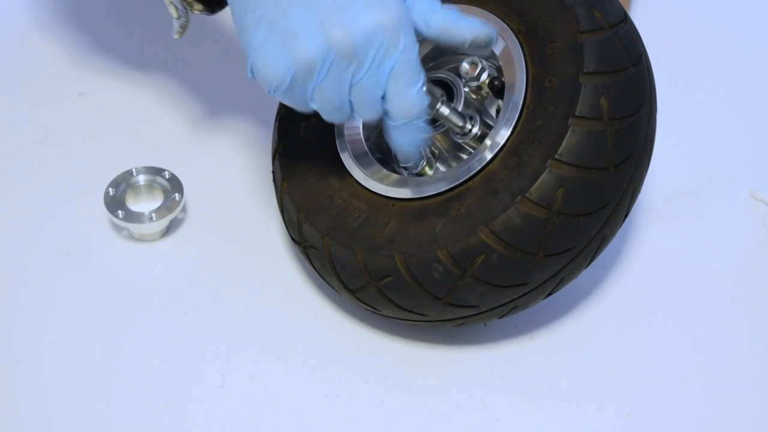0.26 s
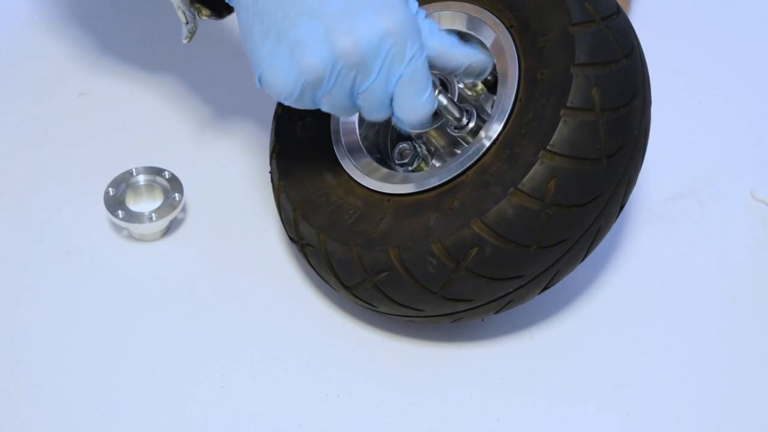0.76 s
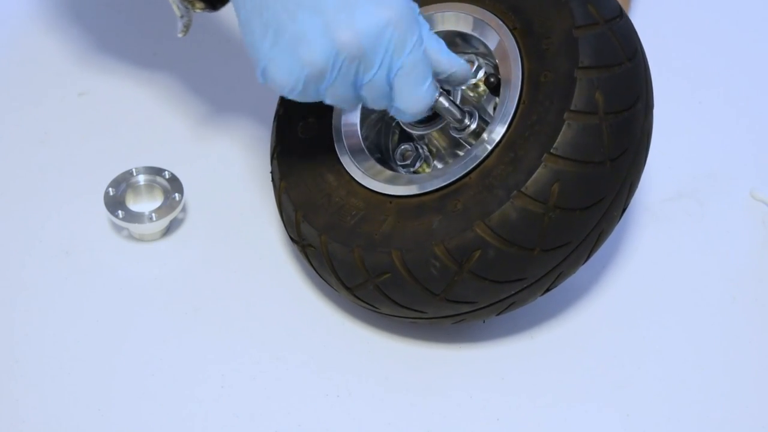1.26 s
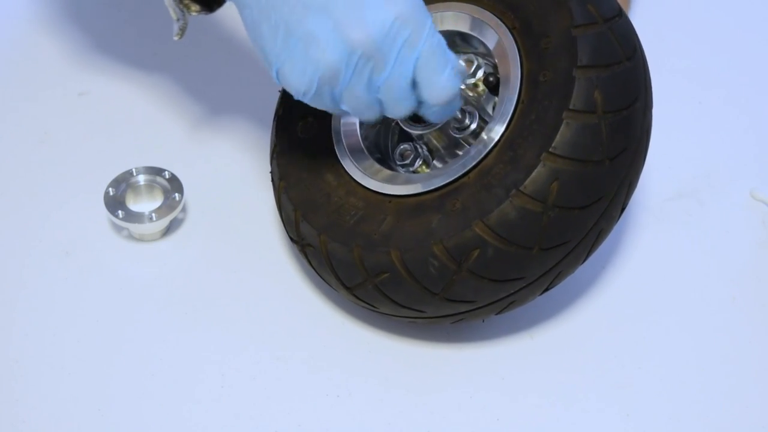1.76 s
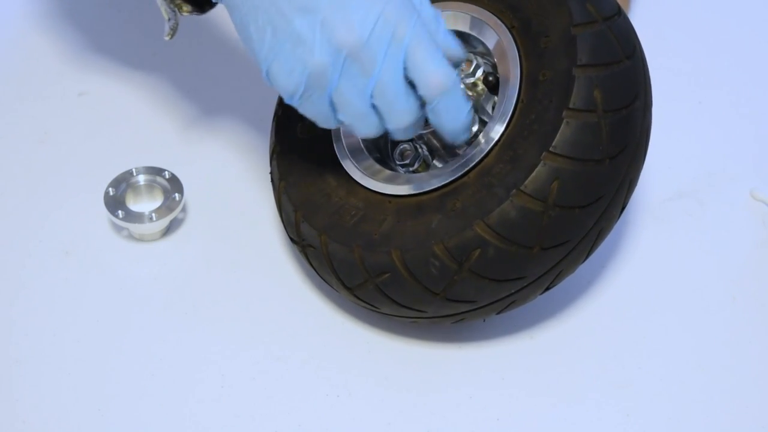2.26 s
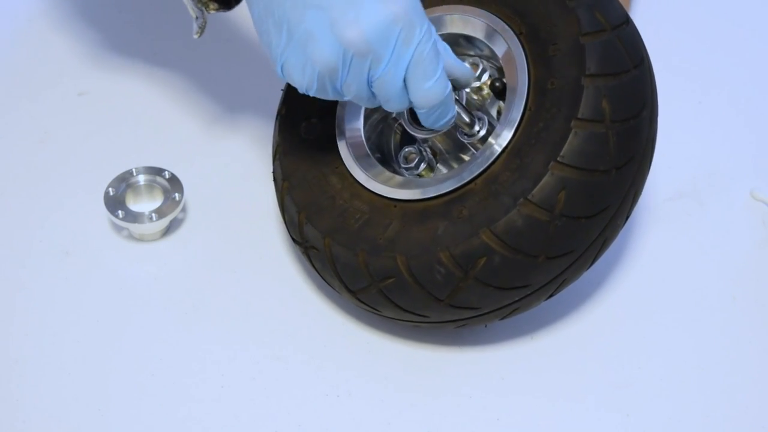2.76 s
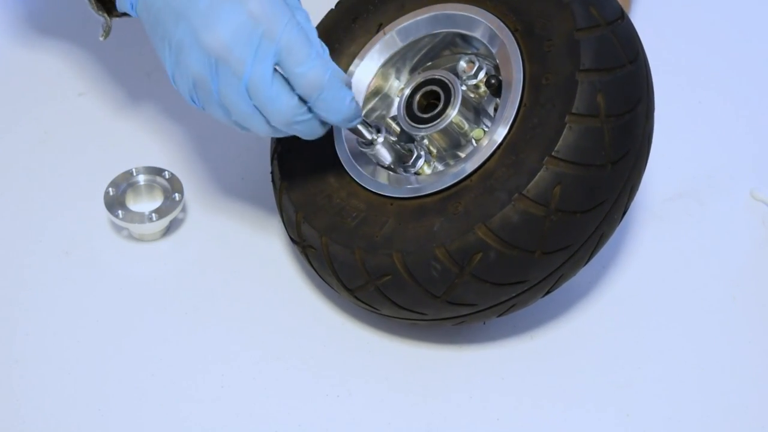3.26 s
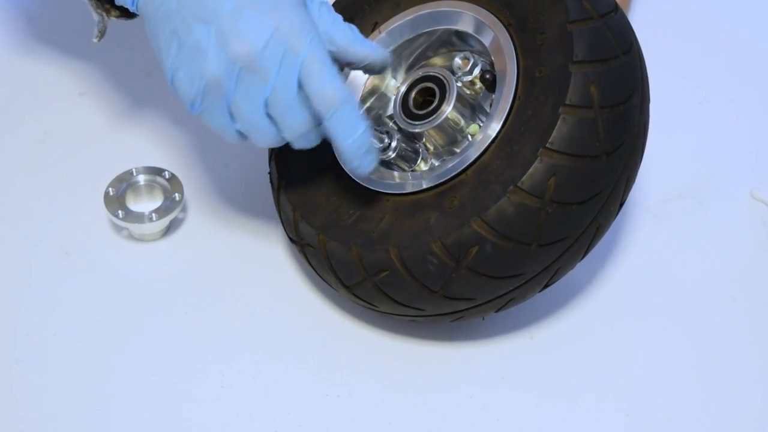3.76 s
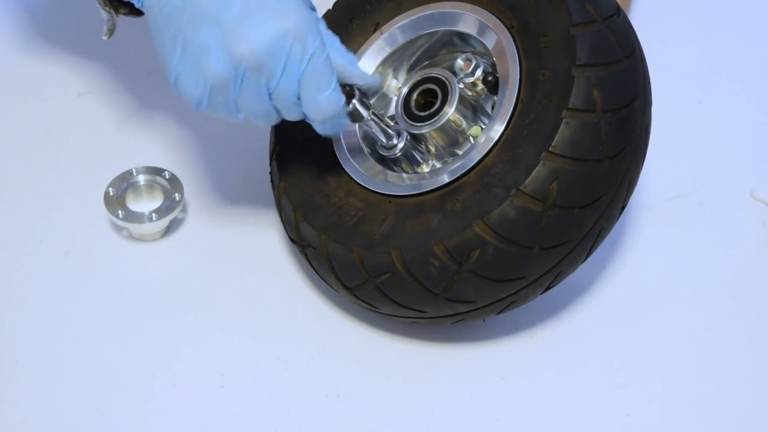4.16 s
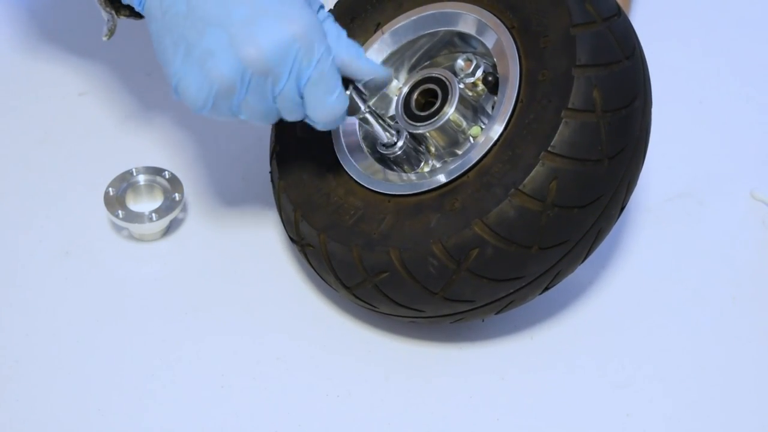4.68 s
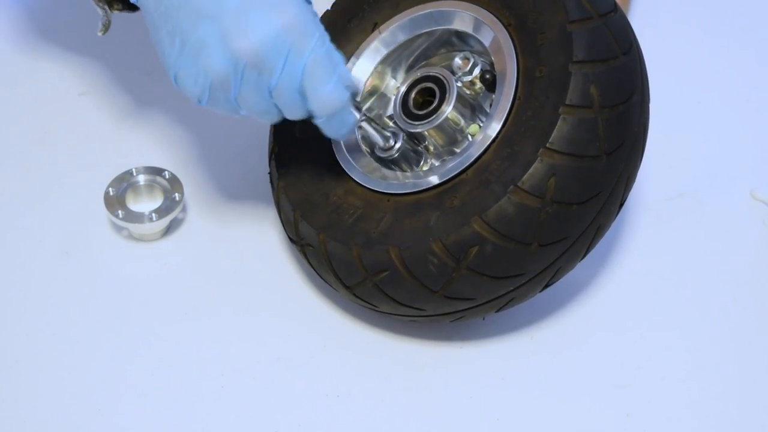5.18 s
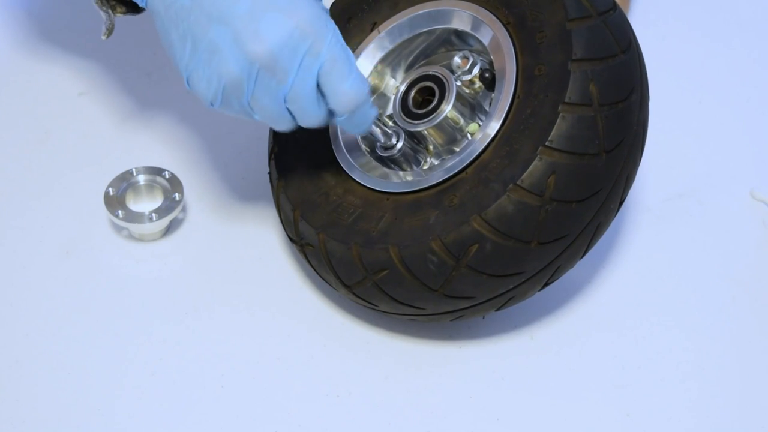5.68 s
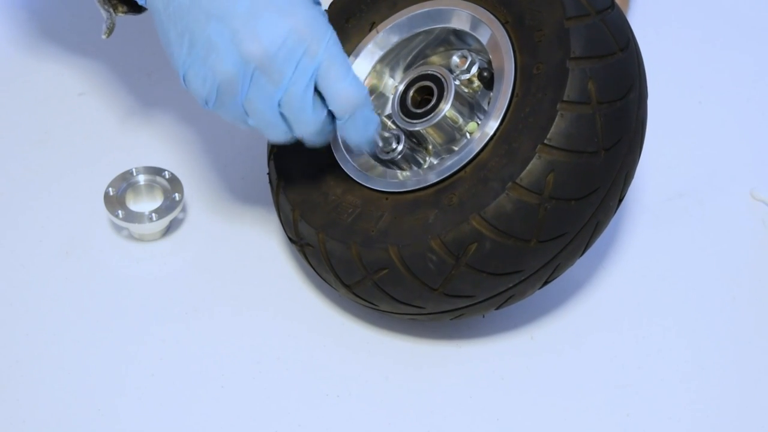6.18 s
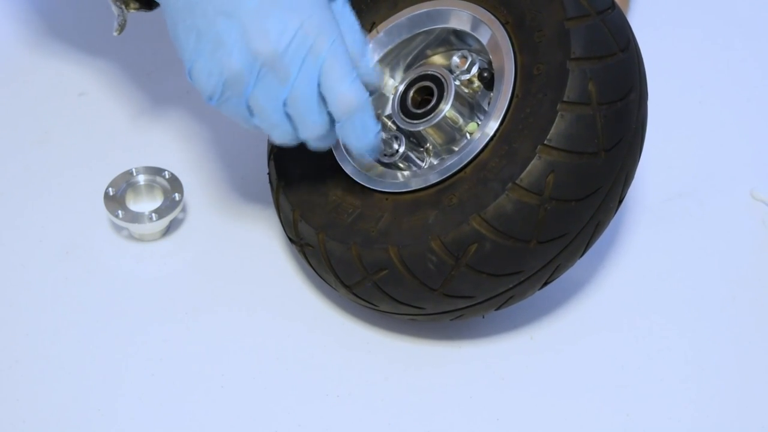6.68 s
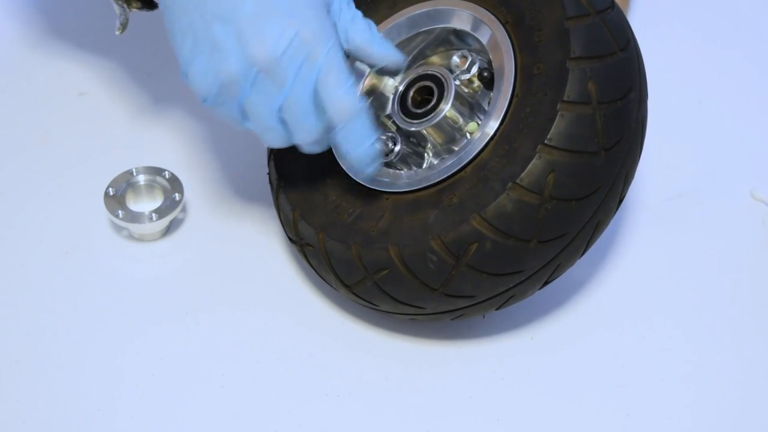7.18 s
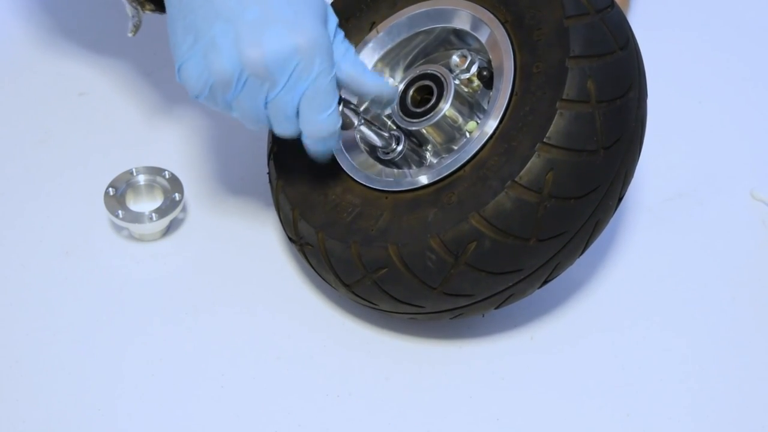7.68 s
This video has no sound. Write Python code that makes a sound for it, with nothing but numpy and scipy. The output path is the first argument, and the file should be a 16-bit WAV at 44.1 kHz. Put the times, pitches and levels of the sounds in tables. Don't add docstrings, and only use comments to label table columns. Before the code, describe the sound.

Gloved fingers twist a small socket on wheel nuts, with uneven metallic clicks, scrapes and pings over a steady fan whirr in a ringing room.

```python
import sys
import numpy as np
from scipy import signal
from scipy.fft import rfft, irfft, next_fast_len
from scipy.io import wavfile
from scipy.ndimage import uniform_filter1d

SR = 44100
rng = np.random.default_rng(int(sys.argv[2]) if len(sys.argv) > 2 else 0)


def invert_db(x):
    u = np.asarray(x, float) / 20
    return 10 ** u


def store_wav(level_fs):
    pcm = np.round(np.clip(np.atleast_2d(level_fs), -1, 1) * 32767)
    wavfile.write(sys.argv[1], SR, pcm.T.astype(np.int16))


N = 350154


def set_rms(x, db):
    return x * invert_db(db) / np.sqrt(np.mean(x ** 2))


def read(table, hz):
    f, v = np.transpose(table)
    return np.interp(np.log(np.maximum(hz, 1)), np.log(f), v)


def colour(x, table, share=1):
    size = next_fast_len(x.shape[-1])
    gain = invert_db(share * read(table, np.fft.rfftfreq(size, 1 / SR)))
    return irfft(rfft(x, size) * gain, size)[..., :x.shape[-1]]


def high_pass(x, hz, order=2):
    return signal.sosfilt(signal.butter(order, hz, "high", fs=SR, output="sos"), x)


def low_pass(x, hz):
    return signal.sosfilt(signal.butter(2, hz, fs=SR, output="sos"), x)


def ring(x, hz, width_hz):
    return signal.lfilter(*signal.iirpeak(min(hz, .4 * SR), hz / width_hz, fs=SR), x)


def ring_twice(x, hz, width_hz):
    return ring(ring(x, hz, width_hz), hz, width_hz)


def walk(rate):
    k = int(SR / rate)
    held = np.repeat(rng.standard_normal(N // k + 1), k)
    return 3.7 * uniform_filter1d(uniform_filter1d(held, k), k)[:N]


def add(track, s, grain, db):
    i = int(s * SR)
    track[i:i + len(grain)] += (grain * invert_db(db) / np.abs(grain).max())[:len(track) - i]


def fan():
    # (frequency [Hz], width [Hz], level [dB], left minus right [dB])
    housing_modes = [(537, 85, -12.5, -2.5), (736, 26, -24, 16.5), (988.5, 49, 3, -5),
                     (1172, 55.6, 4.5, -45), (1306.5, 43, -3.5, 2.5), (1682, 44, -5.5, -25),
                     (1727, 68, -0.5, -7.5), (1943, 27, -2, -40), (2163, 6.8, -2.5, -40),
                     (2450, 140, -13, -42)]
    # (frequency [Hz], density [dB per Hz])
    air_spectrum = [(18, -72), (30, -33.5), (426, -14.5), (569, -7), (780, -14.5), (988, -13), (1070, -21),
                    (1160, -6.5), (1430, -6), (1720, 0.5), (2290, -20.5), (2540, -16.5), (16000, -53.5)]
    # (frequency [Hz], left minus right [dB])
    air_pan = [(60, -3), (110, 1), (200, -4.5), (380, -2.5), (700, -17.5), (1290, -18.5), (2380, 0.5),
               (4400, 0.5), (8120, -3), (15000, 17)]
    housing = 0
    for hz, width_hz, db, pan_db in housing_modes:
        near, far = (ring_twice(rng.standard_normal(N), hz, 1.6 * width_hz) for _ in range(2))
        ports = np.array([invert_db(pan_db) * (.5 * near + 0.65 * far), near])
        housing = housing + invert_db(db + 0.3 * walk(6.6)) * ports
    mid, side = colour(rng.standard_normal((2, N)), air_spectrum)
    side = high_pass(side, 250, order=1) * 0.9
    rush = np.array([colour(mid + side, air_pan, share=.5), colour(mid - side, air_pan, share=-.5)])
    return set_rms(housing, -42.5) + set_rms(rush, -44.5) * invert_db(0.09 * walk(2.7))


def room(dry):
    # (frequency [Hz], T60 [s])
    decay_times = [(200, 0.47), (1000, 0.36), (4000, 0.35), (8000, 0.37), (15000, 0.27)]
    # (frequency [Hz], tail minus direct [dB])
    tail_levels = [(100, -18), (450, 0), (1500, -4.5), (5000, 2.5), (14000, -2)]
    # (frequency [Hz], common share [1])
    coherence = [(100, 0.99), (500, 0.8), (3000, 0.84), (12000, 0.27)]
    gap_s, build_s = .0095, .012
    t = np.arange(int(.7 * SR)) / SR
    hz = np.fft.rfftfreq(len(t), 1 / SR)
    alike = np.clip(read(coherence, hz), 0, 1)
    pose = 2 * np.pi * 2.3 * np.arange(N) / SR
    out = 0
    chance = rfft(rng.standard_normal((2, 3, len(t))))
    for weight, (shared, *own) in zip((np.sin(pose), np.cos(pose)), chance):
        spectrum = np.sqrt(alike) * shared + np.sqrt(1 - alike) * np.array(own)
        tail = 0
        for k in range(5, 15):
            octave = np.clip(1 - np.abs(np.log2(hz + 1) - k), 0, 1)
            band = irfft(spectrum * octave, len(t))
            t60 = read(decay_times, 2. ** k)
            decay = invert_db(read(tail_levels, 2. ** k) - 60 * t / t60)
            tail = tail + band * decay * np.sqrt(2 * np.log(1000) / t60 / SR)
        tail = tail * (1 - 0.045 * np.exp(-t / build_s)) / (1 + np.exp((gap_s - t) * 1000))
        out = out + signal.fftconvolve((dry * weight)[None], tail, axes=1)[:, :N]
    return out


def table_thumps():
    # (time [s], peak [dB], pitch [Hz], rattle minus peak [dB])
    hub_bumps = [(.446, -31.5, 597, 0), (.702, -33, 580, -3), (.843, -36.5, 418, 0), (1.142, -38, 550, -16),
                 (1.213, -32.5, 490, -1.5), (1.509, -35.5, 460, 5), (1.578, -34.5, 530, 0),
                 (1.734, -36, 530, -6), (1.857, -34, 560, 5.5), (2.059, -30, 520, 0),
                 (2.0934, -25, 560, -9), (2.1016, -25, 470, -9), (2.121, -31, 680, -6),
                 (2.162, -36, 540, -14), (2.325, -34.5, 696, 0), (2.355, -35, 470, -12),
                 (2.561, -32.5, 580, -0.5), (3.229, -33.5, 520, 6.5), (4.168, -40, 485, 3),
                 (4.343, -43, 490, 3), (4.458, -36, 485, 1), (5.175, -35, 510, 6), (5.443, -34, 510, 5.5),
                 (5.818, -39, 515, -11), (5.969, -36.5, 505, -6), (6.323, -34, 640, 1),
                 (6.639, -37.5, 543, 4), (6.974, -33.5, 487, 1), (7.013, -46, 460, -10),
                 (7.096, -36.5, 490, 9.5), (7.191, -36, 500, 0), (7.253, -36, 510, -1),
                 (7.359, -35.5, 510, 3), (7.87, -36, 630, 9.5)]
    # (time [s], peak [dB], pitch [Hz])
    tyre_rocks = [(0.845, -73, 218), (1.141, -46, 171), (1.217, -62, 153), (1.501, -56, 172),
                  (2.052, -72, 194), (2.326, -70, 195), (3.231, -42, 155), (3.785, -45, 146),
                  (4.299, -38.5, 145), (4.458, -44, 166), (4.545, -38, 162), (4.762, -47.5, 123),
                  (5.055, -42, 175), (5.17, -47, 166), (5.511, -52, 141), (5.587, -41, 148),
                  (5.709, -42, 177), (5.787, -43, 159), (6.033, -57, 172), (6.153, -44, 148),
                  (6.318, -44, 170), (6.445, -50, 128), (6.645, -40, 159), (7.187, -43, 138),
                  (7.386, -44, 139), (7.49, -44, 180)]
    out, t = np.zeros(N), np.arange(8192) / SR
    chance = rng.standard_normal((len(hub_bumps), 1024))
    for (s, db, hz, rattle_db), noise in zip(hub_bumps, chance):
        push = np.exp(-t * hz * 6.6) * t * hz
        thud = ring(ring(push, hz, .35 * hz), hz, .9 * hz)
        add(out, s + 0.0018, high_pass(thud, 170), db)
        rattle = ring_twice(noise * np.exp(-t[:1024] / 0.042), 1090.0, 1240.0)
        add(out, s + 0.001912, rattle, db + rattle_db)
    for s, db, hz in tyre_rocks:
        push = np.exp(-t * hz * 4.2) * t * hz
        add(out, s, ring(ring(push, hz, 0.32 * hz), hz, 0.56 * hz), db - 10.0)
    return out


def twist_effort():
    # (time at full speed [s], hold [s], scrape [dB], table rumble [dB])
    finger_twists = [(0.128, 0.065, -62.5, -55), (0.416, 0.057, -59.5, -57.5), (0.69, 0.071, -53, -52),
                     (0.99, 0.023, -53.5, -55), (1.255, 0.045, -53.5, -56), (1.527, 0.067, -55.5, -59),
                     (1.786, 0.043, -48, -56), (2.093, 0.024, -43.5, -54), (2.346, 0.074, -61, -55.5),
                     (2.553, 0.14, -51, -56), (3.3, 0.055, -49, -57.5), (3.444, 0.058, -63, -63.5),
                     (3.616, 0.053, -62, -61.5), (3.893, 0.047, -60.5, -58.5), (4.09, 0.15, -58, -55.5),
                     (4.36, 0.025, -57, -54.5), (4.456, 0.11, -53.5, -55), (4.638, 0.14, -61, -59.5),
                     (4.818, 0.14, -59, -58), (5.197, 0.065, -49, -53.5), (5.457, 0.12, -58, -56.5),
                     (5.713, 0.14, -52.5, -55), (6.008, 0.044, -52, -54.5), (6.218, 0.095, -57.5, -54.5),
                     (6.456, 0.11, -57, -56), (6.72, 0.066, -55.5, -52), (6.993, 0.11, -49.5, -56.5),
                     (7.25, 0.057, -55, -54.5), (7.527, 0.037, -54, -54.5), (7.915, .06, -44, -51.5)]
    speed_up, slow_down = 209, 151
    rest_scrape_db, rest_rumble_db = -68, -70.5
    t = np.arange(0, N + 64, 64) / SR
    s, hold, scrape_db, rumble_db = np.transpose(finger_twists)[:, :, None]
    off_db = speed_up * np.clip(s - t, 0, None) + slow_down * np.clip(t - s - hold, 0, None)
    gains = []
    for db, rest_db in ((scrape_db, rest_scrape_db), (rumble_db, rest_rumble_db)):
        energy = np.sum(invert_db(db - off_db) ** 2, axis=0) + invert_db(rest_db) ** 2
        gains.append(np.interp(np.arange(N) / SR, t, np.sqrt(energy)))
    return gains


def thread_drag():
    # (frequency [Hz], density [dB per Hz])
    scrape_spectrum = [(1200, -26), (2000, 20.5), (2800, 15), (4000, 7.5), (5200, 6), (7000, 1.5),
                       (12000, -8.5), (16000, -36)]
    # (frequency [Hz], density [dB per Hz])
    rumble_spectrum = [(18, -71), (30, -54), (161, -13.5), (342, -13.5), (461, -1.5), (613, -7), (727, 1.5),
                       (900, -8), (1170, -37), (1980, -120)]
    # (time [s], brightness [dB])
    grip_brightness = [(0, 11.5), (1.9, 3), (2.1, -4), (2.75, -5.5), (2.95, 9.5), (3.3, -17), (3.45, 8.5),
                       (5.0, 4.5), (5.25, 3.5), (6.1, 8), (6.6, 9.5), (7.04, 0.5), (7.25, 11), (7.94, -2)]
    second_nut_s = 4.0
    scrape_gain, rumble_gain = twist_effort()
    bright_db = np.interp(np.arange(N) / SR, *np.transpose(grip_brightness))
    slip_db = 3.0 * rng.standard_normal(N).clip(-2, 2) + 1.6 * walk(120).clip(-3, 3)
    slips = (rng.random(N) < .07) * rng.standard_normal(N).clip(-2, 2) * invert_db(slip_db)
    scrape = colour(slips, scrape_spectrum)
    song = 0
    for hz, width_hz, gain in ((4990.0, 130.0, 1.0), (12000.0, 400., 0.65)):
        song = song + gain * invert_db(2 * walk(8.3).clip(-4, 2)) * ring(scrape, hz, width_hz)
    scrape = set_rms(scrape + (np.arange(N) > second_nut_s * SR) * song, 0.13)
    dull = low_pass(scrape, 6500)
    hand = invert_db(1.8 * walk(40).clip(-4, 2.5))
    rumble = set_rms(colour(rng.standard_normal(N), rumble_spectrum) * hand, 5.37)
    scrape_gain = scrape_gain * invert_db(1.7 * (walk(22).clip(-4, 2) - 0.6))
    return scrape_gain * (dull + invert_db(bright_db) * (scrape - dull)) + rumble_gain * rumble


def knock_rows():
    # (time [s], high rim ring [dB], low rim ring [dB], bright click [dB], chatter [ms])
    hard_knocks = [(.703, -26.5, -24, -34, 3.5), (.7296, -44, -40, -28, 6.1), (.7384, -30, -23, -46, 3),
                   (1.2755, -35, -24.5, -35, 6.2), (1.731, -45, -31, -42, 8), (1.7637, -38, -51, -40, 6),
                   (1.7863, -45, -19.5, -42, 3.4), (1.8542, -27.5, -32, -31, 5.8),
                   (2.0546, -27.5, -43, -31, 7.5), (2.1009, -27, -32.5, -28, 6),
                   (2.4533, -31, -24, -38, 3.0), (3.0036, -24, -30, -34.5, 4.6),
                   (3.2306, -13.5, -27.5, -45, 5.0), (3.334, -28, -34.5, -28, 7),
                   (4.4582, -28, -34.5, -30.5, 6.8), (4.549, -36, -40, -23, 1.6),
                   (5.17, -28, -39, -31.5, 8.7), (5.4446, -29.5, -61, -30, 5), (5.7085, -30, -30, -40, 5.5),
                   (5.78, -31.5, -40, -35.5, 7.2), (6.32, -29.5, -32.5, -25, 4.7),
                   (7.095, -27.5, -37, -30.5, 6.7), (7.2543, -26.5, -24, -30.5, 6.1),
                   (7.5132, -33, -31, -27, 5.3), (7.8675, -27, -33, -33, 7.6),
                   (7.9266, -24.5, -43, -30, 6.7)]
    # (time [s], ring [dB], bright click [dB])
    wall_taps = [(0.076, -45.5, -44), (0.164, -40.5, -41), (0.202, -41, -44.5), (0.3324, -46, -46),
                 (.427, -46, -58), (0.4408, -37.5, -39.5), (0.6727, -45, -47), (.685, -42, -35),
                 (0.968, -52, -50), (1.0055, -37.5, -42), (1.209, -42, -37.5), (1.2573, -36.5, -48),
                 (1.505, -39, -44.5), (1.544, -37.5, -43), (1.5636, -37, -35.5), (2.224, -44, -60),
                 (2.3993, -54, -44), (2.548, -38.5, -53), (2.634, -44, -49), (2.6764, -38, -50),
                 (3.483, -40.5, -44), (3.609, -45, -45), (4.0634, -48, -56), (4.2555, -44, -45),
                 (4.82, -51, -49), (5.0055, -46, -52), (6.6407, -49, -54), (6.9733, -36, -41),
                 (7.2255, -36, -37.5), (7.6126, -38.5, -37)]
    # (time [s], ring [dB], bright click [dB])
    nut_taps = [(0.7636, -36, -38), (1.878, -34, -55), (1.974, -41, -51), (3.0619, -56, -65),
                (3.289, -30, -59), (3.424, -35.5, -47), (3.63, -39, -41), (3.878, -41, -43.5),
                (4.148, -43, -46), (4.343, -56, -50), (4.382, -39, -49), (4.6345, -32, -46),
                (4.67, -36, -47), (5.045, -39.5, -45.5), (5.2955, -34.5, -42.5), (5.768, -34, -54),
                (5.968, -34, -37.5), (6.0204, -38, -52), (6.2245, -38, -42.5), (6.293, -36, -45),
                (6.5, -40, -56), (6.7107, -44, -46.5), (6.7351, -55, -65), (6.799, -35.5, -46),
                (7.061, -32.5, -46), (7.4826, -43, -47), (7.5666, -36, -53), (7.5795, -33, -41)]
    # (time [s], bright click [dB], high ring [dB], low ring [dB])
    thread_ticks = [(0.1341, -44, -52, -54), (0.6519, -39, -48, -51), (0.8934, -56, -49, -46),
                    (0.9203, -43, -49, -52), (1.0204, -47, -55, -53), (1.0584, -52, -58, -58),
                    (1.1955, -46, -56, -57), (1.345, -51, -46, -40), (1.7704, -27.5, -38, -49),
                    (1.831, -32, -44, -51), (2.325, -50, -56, -40.5), (2.5884, -57, -49, -51),
                    (3.439, -32, -44, -45), (3.8044, -44, -50, -51), (4.1627, -31, -38, -57),
                    (4.1754, -44, -46, -54), (4.1954, -39, -43, -53), (4.207, -44, -44, -47),
                    (4.3064, -54, -51, -51), (4.353, -44, -43, -51), (4.4366, -49, -44, -48),
                    (4.4508, -28, -41, -47), (4.7581, -50, -51, -53), (4.794, -43, -51, -50),
                    (4.8104, -43, -47, -51), (4.885, -51, -43.5, -49), (4.9147, -42, -44, -51),
                    (5.4344, -37, -44, -55), (5.675, -66, -46, -62), (5.7344, -36, -46, -53),
                    (5.8132, -30, -48, -51), (5.8584, -36, -48, -55), (5.889, -31, -40, -51),
                    (5.9234, -52, -50, -54), (6.1504, -36, -46, -54), (6.1978, -43, -46, -53),
                    (6.2764, -43, -46, -51), (6.4313, -36, -44, -51), (6.524, -42, -42, -48),
                    (6.556, -43, -46, -51), (6.5939, -44, -44, -56), (6.6837, -45, -43, -58),
                    (6.9594, -45, -46, -56), (7.048, -42, -44, -49), (7.3604, -47, -44, -51),
                    (7.3854, -48, -48, -48), (7.8286, -44, -45, -53), (5.571, -43, -48, -52),
                    (5.589, -40, -48, -51), (4.555, -36, -44, -50), (4.651, -42, -44, -52),
                    (5.700, -44, -42, -50), (2.5635, -52, -48, -38), (2.67, -48, -48, -42)]
    wall = [(s, db - 2.5, db, click_db, 6.7) for s, db, click_db in wall_taps]
    nut = [(s, db, db - 10.5, click_db, 6.6) for s, db, click_db in nut_taps]
    ticks = [(s, high_db, low_db, click_db - 9.0, 4.9) for s, click_db, high_db, low_db in thread_ticks]
    return hard_knocks + wall + nut + ticks


def fullness_db(grain):
    return 20 * np.log10(np.sqrt(np.sum(grain ** 2)) / np.abs(grain).max())


def rim_knocks():
    # (frequency [Hz], width [Hz], gain [dB])
    rim_modes = [(2000, 1136, 9), (2873, 837, 12), (4360, 670, 3.5), (6130, 600, 4)]
    out, t = np.zeros((2, N)), np.arange(1024) / SR
    rows = knock_rows()
    s, high_db, low_db, click_db, chatter_ms = np.transpose(rows)
    noise = rng.standard_normal((len(rows), len(t)))
    settle = np.clip(chatter_ms, .5, 30)[:, None] / 1000
    shape = (1 - np.exp(-8 * t / settle)) * np.exp(-1.1 * t / settle) / (1 + (t / (1.5 * settle)) ** 6)
    blows = np.vstack([noise * np.sqrt(np.abs(noise)) * shape, t == 0])
    strength_db = np.maximum(high_db, low_db).clip(-60, -24) + 47.0
    blows[:-1, 0] += 17.0 * invert_db(0.3 * strength_db) / chatter_ms
    rim = [invert_db(gain_db) * ring_twice(blows, hz, 2.6 * width_hz) for hz, width_hz, gain_db in rim_modes]
    click = ring_twice(blows, 9700.0, 6200.0)
    parts = ((rim[0] - rim[1], .00088, low_db + 5.5),
             (rim[2] - rim[3], .0008, high_db - .6),
             (click, .00054, click_db + 2.0))
    for (*grains, plain), late_s, peak_db in parts:
        for at, grain, db in zip(s + late_s, grains, peak_db):
            add(out[0], at, grain, db)
            add(out[1], at, plain, db + fullness_db(grain) - fullness_db(plain))
    return out


def socket_pings():
    # (time [s], peak [dB], pitch [Hz], chatter [ms])
    loose_pings = [(1.8547, -27, 5680, 11), (3.0041, -18.5, 5850, 4.3), (5.7803, -36, 5150, 7.4),
                   (6.0214, -30, 5000, 13), (6.797, -40, 5050, 8.0), (1.5643, -30, 10700, 3.3),
                   (3.2301, -35, 10700, 3.0), (3.3338, -30, 10930, 3.8), (4.5486, -31, 13000, 1.8),
                   (5.9673, -25, 12000, 3.6), (7.254, -21, 10700, 4.0), (7.0933, -29, 11150, 2.7),
                   (7.2549, -21, 11800, 4.3), (7.869, -26, 11450, 3.0), (2.4545, -33, 13900, 3.0),
                   (3.0051, -30, 13100, 3.0), (3.2335, -41, 14100, 3.0), (.703, -19.5, 3130, 2.8),
                   (.703, -28.5, 4630, 3.0), (.739, -33, 2900, 3.0), (1.009, -37, 3950, 5.0),
                   (1.277, -30, 2320, 4.0), (1.787, -30, 2520, 3.0), (3.231, -23, 5560, 6.0),
                   (3.424, -34, 5230, 4.0), (3.424, -40, 11000, 3.0), (3.4815, -36, 10700, 3.4),
                   (4.353, -42, 12000, 5.0), (5.968, -34, 5050, 5.0), (6.198, -42, 11700, 4.0),
                   (6.29, -41, 5100, 6.0), (7.2255, -31, 12000, 3.0), (4.92, -43, 5000, 10.0),
                   (2.549, -32, 3000, 4.0), (7.2565, -23, 2290, 3.0), (7.254, -19.5, 2900, 2.7),
                   (7.2575, -21.5, 5600, 3.0), (1.7325, -32, 12200, 3.0), (1.7315, -34, 6000, 5.0),
                   (1.731, -17, 2700, 1.0), (2.2222, -29.5, 2150, 3.0), (3.340, -33, 9500, 2.0)]
    # (time [s], peak [dB], pitch [Hz], chatter [ms])
    free_rings = [(3.232, -42, 14200, 4.0), (3.425, -40, 5300, 6.0), (4.17, -40, 5050, 11),
                  (4.47, -36, 5070, 11), (4.93, -45, 5020, 11), (5.782, -40, 5050, 9.0),
                  (5.968, -38, 12050, 5.0), (6.022, -35, 4850, 11), (6.285, -42, 5000, 9.0),
                  (6.5, -37.5, 4940, 11), (6.797, -39, 5060, 9.0), (7.096, -33, 5100, 8.7),
                  (7.256, -21, 11930, 6.0), (7.575, -34.5, 5030, 10), (7.87, -34, 11900, 4.0),
                  (2.455, -36, 13900, 4.0), (3.005, -35, 13100, 4.0), (2.455, -38, 8900, 4.0),
                  (4.55, -36, 12800, 4.0), (1.856, -33, 5750, 6.0)]
    # (time [s], peak [dB], centre [Hz], chatter [ms])
    dry_cracks = [(3.2315, -16, 4200, 5), (4.549, -24, 8700, 2.5), (4.558, -33, 9000, 4.0),
                  (6.32, -27, 14000, 4.0), (6.325, -27, 9000, 3.0), (7.513, -32, 13500, 3.0),
                  (7.613, -34, 11000, 3.0), (5.168, -28, 5300, 3.0), (2.054, -32, 4100, 2.7),
                  (2.453, -27, 3200, 2.7), (1.86, -31, 5600, 9.0), (4.5, -38, 8400, 3.0),
                  (3.2305, -16, 3000, 4.0), (.7385, -26, 2700, 1.5), (6.329, -33, 6000, 3.0)]
    out, t = np.zeros((2, N)), np.arange(1024) / SR
    events = []
    for table, share in ((loose_pings, 0.067), (free_rings, 0.013), (dry_cracks, 0.37)):
        events += [(*row, share) for row in table]
    chance = rng.standard_normal((len(events), len(t)))
    for (s, db, hz, chatter_ms, share), noise in zip(events, chance):
        shape = t * np.exp(-2000 * t / np.clip(chatter_ms, .5, 12)) / (1 + (800. * t / chatter_ms) ** 6)
        blow = np.array([noise * shape, t == 0])
        grain, plain = ring(ring(blow, hz, share * hz), hz, max(share, 0.12) * hz)
        add(out[0], s + 0.00095, grain, db - 7.0)
        add(out[1], s + 0.00079, plain, db - 7.5 + fullness_db(grain) - fullness_db(plain))
    return out


def scene():
    # (frequency [Hz], left minus right [dB])
    work_pan = [(300, -.5), (800, 2), (2400, 4.5), (8000, 4), (15000, 0)]
    work, radiated = rim_knocks() + socket_pings() + table_thumps() + thread_drag()
    left, right = work + room(radiated)
    return np.array([colour(left, work_pan, share=.5), colour(right, work_pan, share=-.5)]) + fan()


def band_limit(x):
    return signal.sosfilt(signal.butter(12, 15800, fs=SR, output="sos"), x)


def record(dry):
    hiss = invert_db(-70.5) * rng.standard_normal(dry.shape)
    mix = low_pass(high_pass(dry + hiss, 45.), 15500)
    return band_limit(mix)


dry = scene()
out = record(dry)
store_wav(out)
```